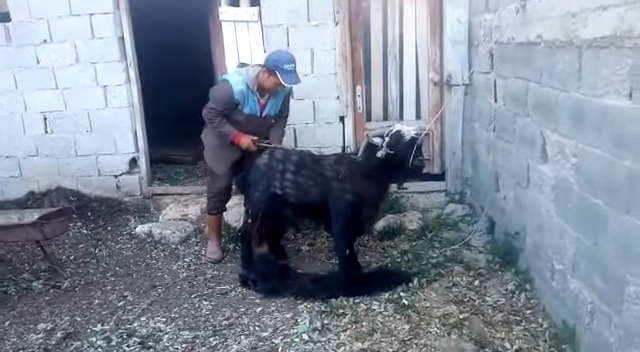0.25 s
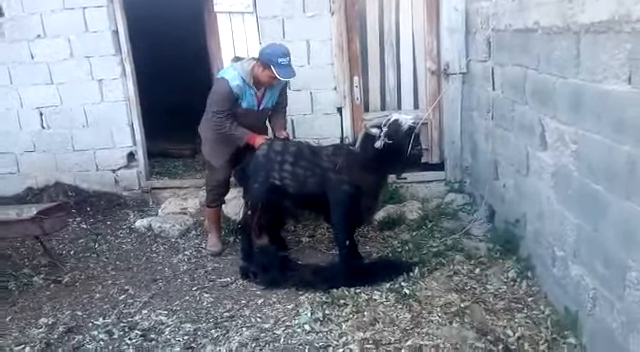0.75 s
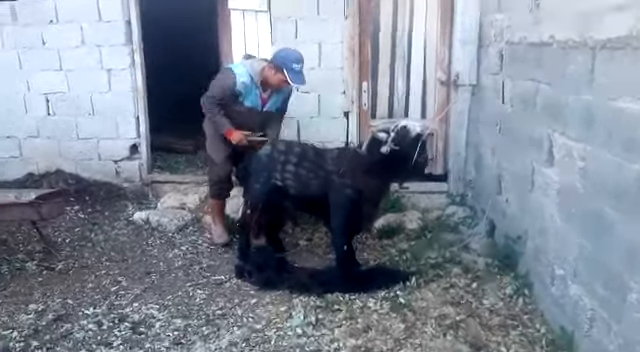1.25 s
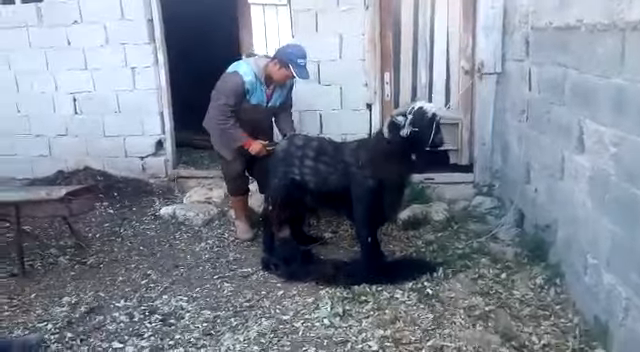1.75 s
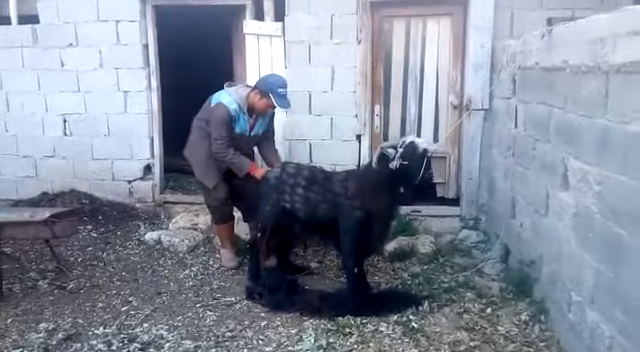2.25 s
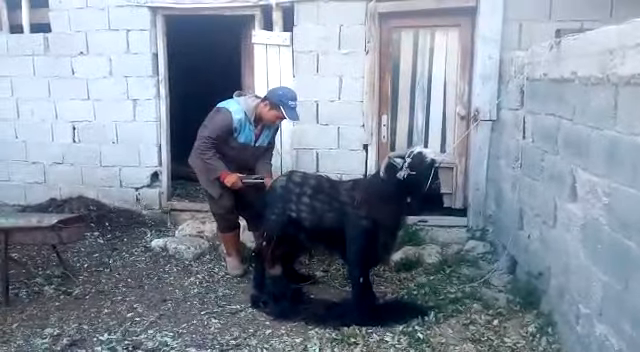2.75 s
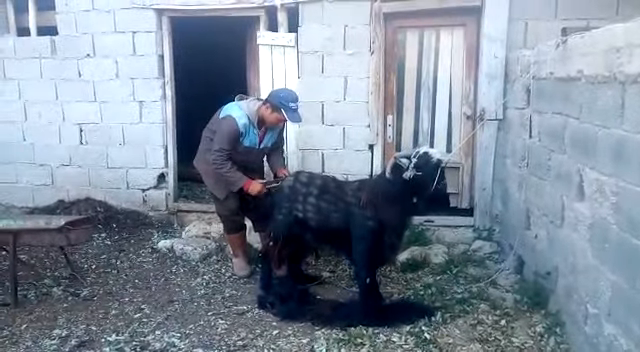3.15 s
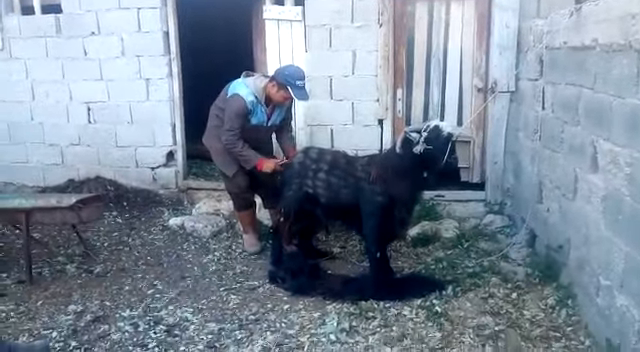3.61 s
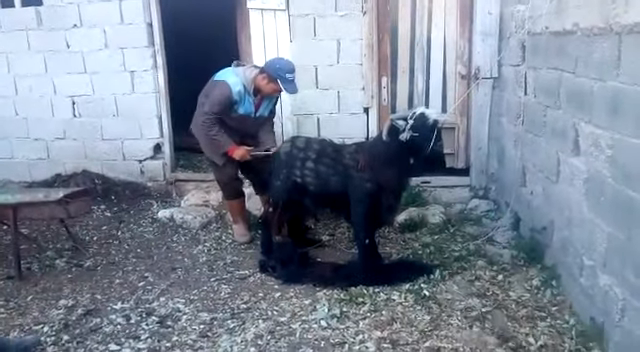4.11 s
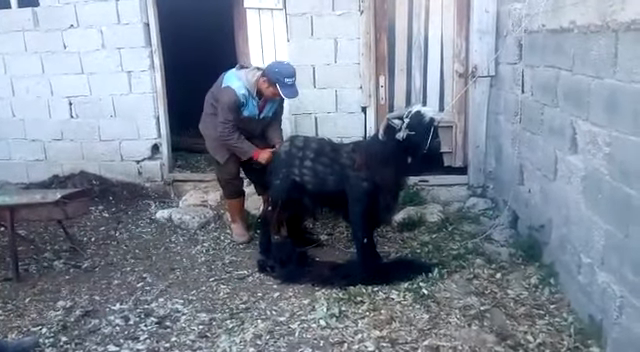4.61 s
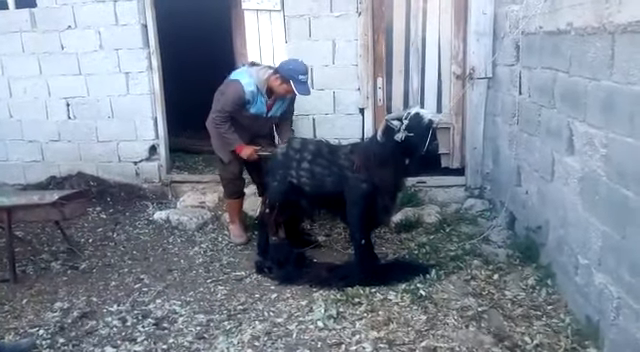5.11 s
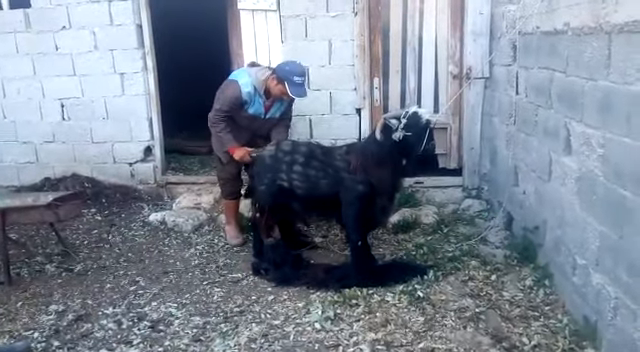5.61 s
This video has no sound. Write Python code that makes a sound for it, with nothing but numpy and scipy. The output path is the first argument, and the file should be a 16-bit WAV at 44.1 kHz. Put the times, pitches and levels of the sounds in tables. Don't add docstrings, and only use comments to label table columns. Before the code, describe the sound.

Outdoors in a small block-walled yard, heard through a modest hissy microphone at some distance, hand shears cut long animal hair. The opening holds only the dying echo of a previous cut and a faint opening scrape at 0.1 s. A soft, knocking snip lands at 1.0 s, preceded by a short gritty rasp with a thin squeak, followed by a light opening rasp near 1.16 s. Low bumps and tiny ticks come around 1.25 s, then a faint rub. After dull scuffs near 2.2 s, a firm snip hits at 2.27 s, reopening at 2.4 s. Small ticks at 3.07 and 3.35 s lead to the hardest, brightest snap at 3.59 s, opening at 3.74 s. A quick brush passes near 4.05 s. The last, softer, clacking cut falls at 4.9 s, opening at 5.08 s. Each metallic chatter is very short, with quick wall reflections; quiet airy rumble and hiss continue to about 6 s.

```python
import sys
import numpy as np
from scipy import signal
from scipy.fft import rfft, irfft
from scipy.io import wavfile

SR = 44100
rng = np.random.default_rng(int(sys.argv[2]) if len(sys.argv) > 2 else 0)


def put_to_file(sound):
    columns = np.atleast_2d(sound).T
    safe = np.clip(columns, -1, 1)
    whole_steps = np.round(safe * 32767)
    wavfile.write(sys.argv[1], SR, whole_steps.astype(np.int16))


def natural_amplitude(level_db):
    exponent = np.asarray(level_db, float) / 20
    return 10 ** exponent


N = 258733
LEAD = 4096

# first_contact_s, strength_db, handle_clack_db, blade_knock_db, bright_edge_db
CUTS = [
    (-.045, -1.5, -8, -15, -4),
    (1.0052, -5, -5, 3, -2.5),
    (2.2704, 1, -4, -2.5, -1.5),
    (3.5882, 4, -6.5, -4, -1.5),
    (4.8983, -1.5, 0, -3, -0.5),
]
# start_s, rasp_db, loudest_tone_hz, second_tone_hz
OPENINGS = [
    (0.113, -49.5, 5470, 4540),
    (1.163, -47.5, 4490, 3570),
    (2.418, -49.5, 6320, 3550),
    (3.741, -48, 4330, 6390),
    (5.076, -48, 6240, 2100),
]


def slam():
    # time_s, blow_db
    contacts = [(-.045, -11.5), (1.002, -31), (1.0068, -8), (1.0096, -16), (1.0125, -5), (1.016, -17.5),
                (2.2705, -11), (2.2716, -13), (2.2760, -14.5), (2.2813, -17.5), (3.583, -37.5),
                (3.586, -11.5), (3.5906, -17.5), (3.5930, -16), (3.5968, -21.5), (3.6001, -22.5),
                (4.8978, -11), (4.9006, -14), (4.904, -19), (4.9068, -19), (4.9104, -25.5)]
    # pitch_hz, level_db, time_to_fade_60_db_s
    blade_modes = [(540, -22, 0.023), (701.3, -21, 0.032), (1220, -29, 0.02), (1650, -16, 0.042),
                   (2207, -20.5, .015), (2410, -15, 0.019), (2575, -9, 0.031), (2894, -10, .013),
                   (3540, -35.5, 0.028), (4300, -14.5, 0.028), (4550, -11.5, 0.03), (5090, -8, 0.035),
                   (5360, -19.5, 0.021), (5900, -17, 0.0149), (6450, -13.5, 0.0159), (6580, -19.5, .015),
                   (6750, 2, .015), (7180, -7, 0.013), (7240, -18.5, .015), (8414, -25.5, 0.014),
                   (9000, -19.5, 0.01222), (11300, -24.5, 0.013), (12200, -20, .015), (12900, -24, 0.0081),
                   (14500, -23, .01)]
    # pitch_hz, level_db (per Hz)
    crack = [(300, -63.5), (550, -31.5), (1100, -37), (1600, -23.5), (2750, -5.5), (3700, -20), (4600, -15),
             (6000, -13), (6800, 1), (8000, -46.5), (10400, -27.5), (14800, -24.5), (16500, -47)]
    # low_hz, high_hz
    parts = [
        (430, 1800),
        (1800, 4000),
        (4000, 8000),
        (8000, 16700),
    ]
    part_levels = [1, 4, -1.5, -0.5]
    # change of clack, knock and edge (dB per s)
    bounce_tint = (-250, -500, 248.5)
    spread_db, chatter_s, crack_db = 4.5, 0.0013, 24

    cuts = np.array(CUTS)
    s, blow_db = np.transpose(contacts)
    cut = cuts[np.abs(s[:, None] - cuts[:, 0]).argmin(axis=1)]
    blow_db = blow_db + cut[:, 1]
    since_first_s = np.maximum(s - cut[:, 0], 0)
    clack_db, knock_db, edge_db = (cut[:, 2:] + np.outer(since_first_s, bounce_tint)).T
    spots = (s * SR).round().astype(int)[:, None] + LEAD + np.arange(256)
    chance = rng.standard_normal((len(s), len(blade_modes)))
    age = np.arange(256) / (chatter_s * SR)
    chatter = rng.standard_normal((len(s), 256)) * np.sqrt(age) * np.exp(-age)
    chatter_energy = np.mean(np.sum(chatter ** 2, 1))

    def force(touch, db):
        train = np.zeros(N + LEAD)
        np.add.at(train, spots, touch * natural_amplitude(db)[:, None])
        return train

    out = 0
    for (low_hz, high_hz), part_db, tint_db in zip(parts, part_levels, (clack_db, knock_db, 0, edge_db)):
        part_blow_db = blow_db + tint_db + part_db
        heard = np.array([colour(row, crack) for row in band(chatter, low_hz, high_hz)])
        energy = np.sum(heard ** 2, 1, keepdims=True)
        touch = chatter / np.sqrt(energy) * np.sqrt(np.mean(energy) / chatter_energy)
        out = out + natural_amplitude(crack_db) * band(colour(force(touch, part_blow_db), crack), low_hz, high_hz)
        for k, (hz, level_db, t60) in enumerate(blade_modes):
            if low_hz <= hz < high_hz:
                mode_db = part_blow_db + level_db - 2 + spread_db * chance[:, k]
                mode = ring(force(touch, mode_db), hz, min(t60, 34 / hz + 0.008))
                out = out + band(mode, hz / 2.2, min(hz * 1.15, 17000))
    return out


def rasp():
    # pitch_hz, level_db (per Hz)
    crunch = [(880, -38.5), (1500, -12.5), (1810, -13), (3740, -7.5), (4080, -4.5), (6500, 1),
              (8500, -18.5), (11000, -39), (18700, -120)]
    # pitch_hz, level_db (per Hz)
    sheen_colour = [(7000, -24.5), (8300, -0.5), (10000, -4), (13000, -11.5), (14800, -3.5), (15700, -6),
                    (16000, -34.5)]
    crunch_db, grit_db = -2.0, 2.5
    t, level, sheen = np.arange(N) / SR, np.zeros(N), np.zeros(N)
    for s, level_db, sheen_db in strokes():
        moving = (t >= s[0]) & (t < s[-1])
        level[moving] += natural_amplitude(np.interp(t[moving], s, level_db))
        sheen[moving] += natural_amplitude(np.interp(t[moving], s, level_db + sheen_db))
    grit = rng.standard_normal((2, N)) * natural_amplitude(grit_db * drift(500.0))
    crunching = natural_amplitude(crunch_db) * level * rms_one(colour(grit[0], crunch))
    return crunching + sheen * rms_one(colour(grit[1], sheen_colour))


def strokes():
    # edges_bite_s, rasp_db, hair_gives_s, rasp_db
    closings = [
        (0.952, -45, .972, -50),
        (2.231, -47, 2.254, -49),
        (3.555, -44.5, 3.574, -49),
        (4.797, -48, 4.868, -51.5),
    ]
    closing_sheen = (-28.5, -20.5, -14.5, -12.5, -19)
    # start_s, hold_s, rasp_db, sheen_db (against the rasp)
    idle_rubs = [
        (0.753, 0.17, -62.5, -31),
        (1.398, 0.039, -61.5, -20),
        (4.038, 0.026, -59.5, -19),
        (4.078, .008, -58, -18.5),
    ]
    silent_db, meet_db = -75, -42
    bite_rise, open_rise, open_fall = 477, 2000, 560
    open_hold_s, open_sheen_db = 0.0037, -16

    for (bite_s, bite_db, give_s, give_db), (meet_s, *_) in zip(closings, CUTS[1:]):
        start_s = bite_s - (bite_db - silent_db) / bite_rise
        held_s = bite_s + 0.7 * (give_s - bite_s)
        levels = np.array([silent_db, bite_db, bite_db - 2.0, give_db, meet_db])
        yield (start_s, bite_s, held_s, give_s, meet_s), levels, np.array(closing_sheen)
    opening_rubs = [(s, open_hold_s, level_db, open_sheen_db) for s, level_db, *_ in OPENINGS]
    for s, hold_s, level_db, sheen_db in [*opening_rubs, *idle_rubs]:
        span_db = level_db - silent_db
        end_s = s + hold_s
        corners = (s - span_db / open_rise, s, end_s, end_s + span_db / open_fall)
        yield corners, np.array([silent_db, level_db, level_db, silent_db]), sheen_db


def squeaks():
    # start_s, length_s, pitch_hz, level_db
    closing_tones = [(0.921, 0.035, 5360, -51), (0.936, 0.039, 5320, -44.5), (.93, 0.062, 4450, -69.5),
                     (0.938, .03, 6800, -54.5), (0.967, 0.023, 9250, -64), (2.206, 0.02, 4160, -65),
                     (2.225, 0.032, 6160, -54.5), (2.258, .014, 6797, -42), (3.507, 0.038, 4420, -60),
                     (3.534, 0.065, 6450, -47), (3.539, 0.026, 5530, -48.5), (3.569, 0.026, 3740, -58),
                     (4.788, 0.055, 6720, -49.5), (4.79, 0.043, 4560, -56), (4.794, 0.034, 8400, -62)]
    lead_s, length_s, width_hz = 0.0069, 0.031, 120
    opening_tones = []
    for s, level_db, loudest_hz, second_hz in OPENINGS:
        opening_tones.append((s - lead_s, length_s, loudest_hz, level_db - 7))
        opening_tones.append((s - lead_s, length_s, second_hz, level_db - 9))
    tones = [*closing_tones, *opening_tones]
    return rubbed_tones([(s, long_s, hz, width_hz, level_db) for s, long_s, hz, level_db in tones])


def shuffles():
    # start_s, length_s, pitch_hz, width_hz, level_db
    rubs = [
        (.745, .17, 6000, 400, -67),
        (1.24, 0.024, 140, 140, -57.5),
        (1.4, .15, 1500, 900, -67),
        (1.75, .25, 2690, 710, -68),
        (2.19, 0.071, 230, 122, -51),
        (2.2, 0.053, 421, 200, -56.5),
        (3.64, 0.45, 540, 148, -66.5),
        (4.06, 0.04, 1500, 2000, -58.5),
        (4.066, .035, 6600, 500, -67),
    ]
    return rubbed_tones(rubs)


def bumps():
    # time_s, peak_db, pitch_hz, time_to_fade_60_db_s
    knocks = [
        (1.236, -44, 112, 0.048),
        (1.269, -41, 120, 0.044),
        (1.2677, -44, 700, 0.0055),
        (1.268, -40, 1480, 0.0054),
        (2.156, -46, 300, 0.0094),
        (2.196, -42, 503, 0.016),
        (3.069, -46.5, 3080, 0.0092),
        (3.35, -46, 1680, 0.014),
    ]
    out = np.zeros(N)
    for s, peak_db, hz, t60 in knocks:
        click = np.zeros(N)
        click[round(s * SR)] = natural_amplitude(peak_db)
        out += ring(click, hz, t60)
    return out


def yard(x):
    # delay_s, level_db, smear_s, dull_above_hz
    walls = [
        (0.0016, -8, 0.0082, 17000),
        (0.026, -25.5, .004, 12000),
        (0.015, -29, 0.032, 6900),
        (.058, -34, 0.027, 6200),
    ]
    t, response = np.arange(SR // 4) / SR, 0
    scatter = rng.standard_normal(len(t))
    for delay_s, level_db, smear_s, dull_hz in walls:
        after = np.maximum(t - delay_s, 0) / smear_s
        swarm = natural_amplitude(level_db - 22.0) * scatter * (1 - np.exp(-4.0 * after)) * np.exp(-after)
        response = response + signal.sosfilt(signal.butter(2, dull_hz, fs=SR, output="sos"), swarm)
    return signal.fftconvolve(x, response)[:len(x)]


def hush():
    # pitch_hz, level_db (per Hz)
    hush_colour = [(20, -15), (30, -19.5), (46, -4.5), (70, -1.5), (180, -5.5), (330, -9.5), (600, -13),
                   (3100, -20.5), (6600, -23), (8100, -36.5), (13700, -38), (15000, -25.5), (15700, -28.5),
                   (15950, -71)]
    # time_s, level_db
    swell = [(0.0, -64.5), (0.59, -62.5), (2.29, -60.5), (3.04, -62), (4.69, -62.5), (5.11, -63),
             (5.62, -63), (5.87, -61.5)]
    borders = (300, 1200, 7500)
    shares = (0.98, .3, 0.11)
    tones = rfft(rms_one(colour(rng.standard_normal(N + LEAD), hush_colour)[LEAD:]))
    layer = np.searchsorted(borders, np.fft.rfftfreq(N, 1 / SR))
    s, swell_db = np.transpose(swell)
    air_db = np.interp(np.arange(N) / SR, s, swell_db - np.median(swell_db))
    out = irfft(tones * (layer == 3), N)
    for k, share in enumerate(shares):
        out += natural_amplitude(share * air_db) * irfft(tones * (layer == k), N)
    return natural_amplitude(-58) * out


def rubbed_tones(rows):
    out, rough = np.zeros(N), drift(250.0)
    for s, length_s, hz, width_hz, level_db in rows:
        at, size = round(s * SR), round(length_s * SR)
        grit = rng.standard_normal(size + 2048)
        tone = rms_one(band(grit, max(hz - width_hz / 2, 20), hz + width_hz / 2)[2048:])
        tone = tone * natural_amplitude(4.0 * rough[at:at + size])
        out[at:at + size] += natural_amplitude(level_db) * tone * np.sqrt(np.hanning(size))
    return out


def ring(clicks, hz, t60):
    r, w = natural_amplitude(-60 / (t60 * SR)), 2 * np.pi * hz / SR
    return signal.lfilter([0, np.sin(w)], [1, -2 * r * np.cos(w), r * r], clicks + 1e-18)


def colour(x, spectrum):
    hz, db = np.transpose(spectrum)
    grid = np.fft.rfftfreq(8192, 1 / SR) + 1
    cepstrum = irfft(np.log(natural_amplitude(np.interp(np.log(grid), np.log(hz), db))))
    cepstrum[1:4096] *= 2
    response = irfft(np.exp(rfft(cepstrum[:4097], 8192)))
    return signal.fftconvolve(x, response)[:len(x)]


def band(x, low_hz, high_hz):
    return signal.sosfilt(signal.butter(2, [low_hz, high_hz], "band", fs=SR, output="sos"), x)


def drift(rate_hz):
    knots = rng.standard_normal(int(N / SR * rate_hz) + 2)
    return np.interp(np.arange(N) / SR * rate_hz, np.arange(len(knots)), knots)


def rms_one(x):
    return x / np.sqrt(np.mean(x ** 2) + 1e-20)


def scene():
    thin_blades = signal.butter(6, [450, 15900], "band", fs=SR, output="sos")
    shut = signal.sosfilt(thin_blades, slam())
    shut = signal.lfilter(*signal.iirnotch(920, 1.8, SR), shut)
    shears = (shut + yard(shut))[LEAD:] + rasp() + squeaks()
    return (shears + shuffles() + bumps() + hush())[None]


def band_limit(x):
    return signal.sosfilt(signal.butter(12, 16790, fs=SR, output="sos"), x)


def record(dry):
    mix = signal.sosfilt(signal.cheby2(10, 50, 17000, fs=SR, output="sos"), dry)
    return band_limit(mix)


dry = scene()
out = record(dry)
put_to_file(out)
```